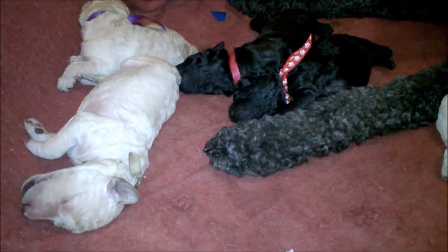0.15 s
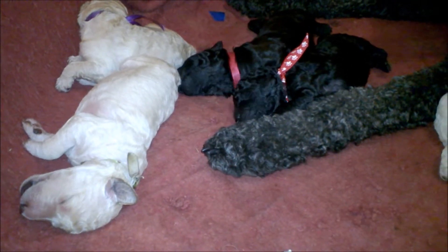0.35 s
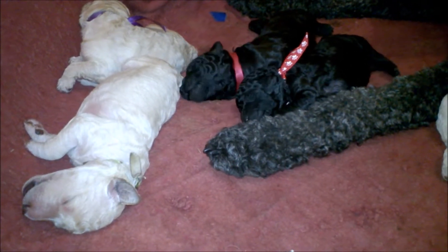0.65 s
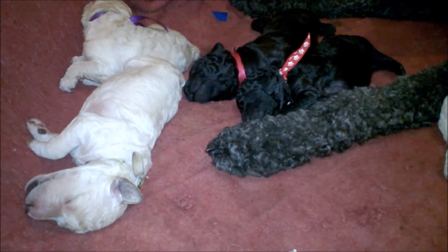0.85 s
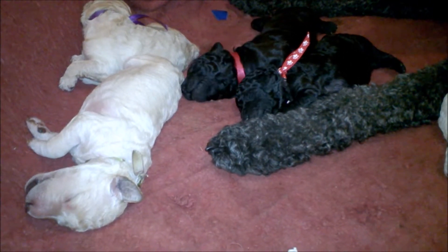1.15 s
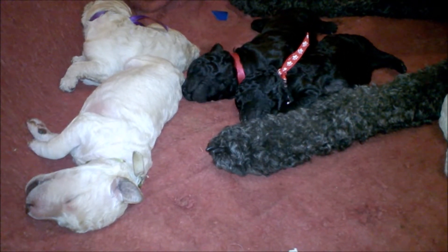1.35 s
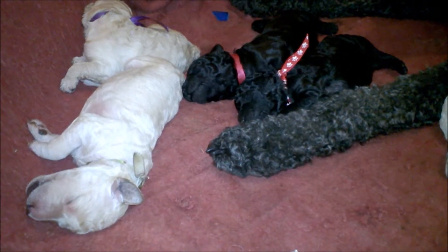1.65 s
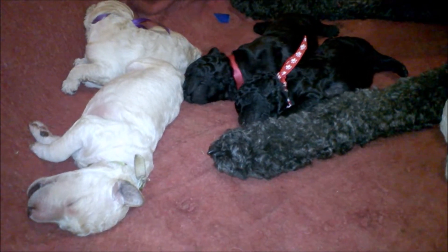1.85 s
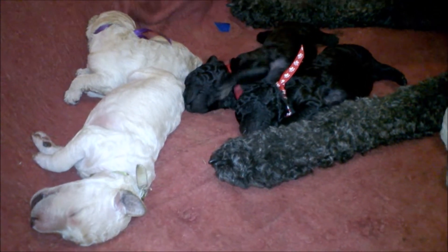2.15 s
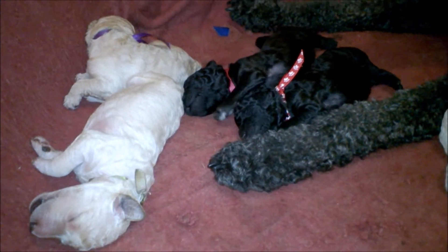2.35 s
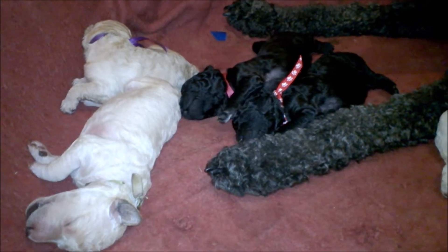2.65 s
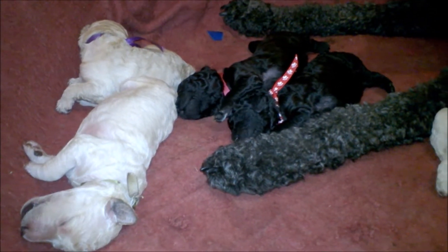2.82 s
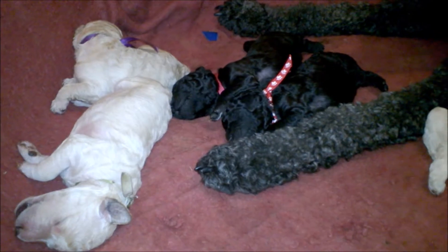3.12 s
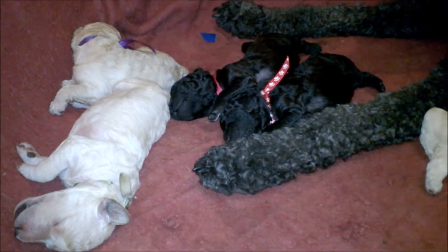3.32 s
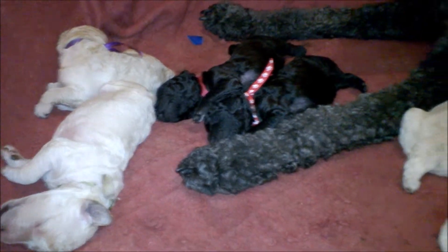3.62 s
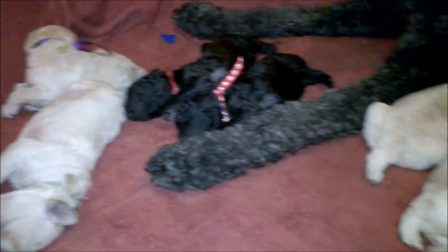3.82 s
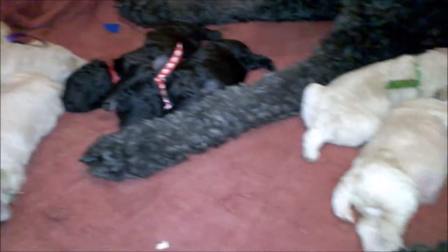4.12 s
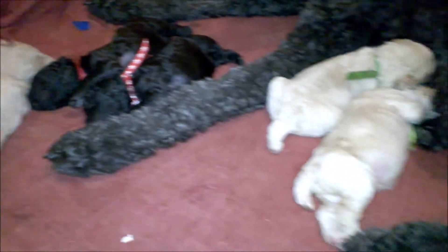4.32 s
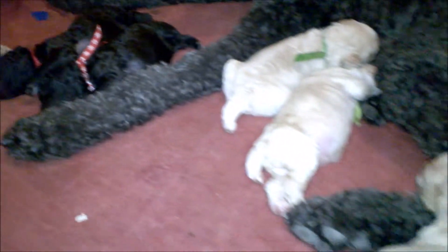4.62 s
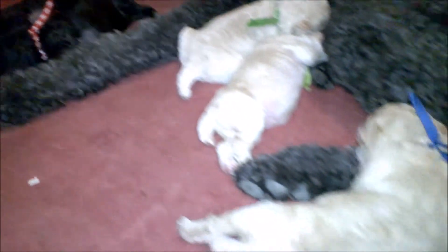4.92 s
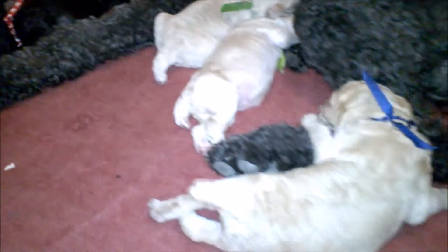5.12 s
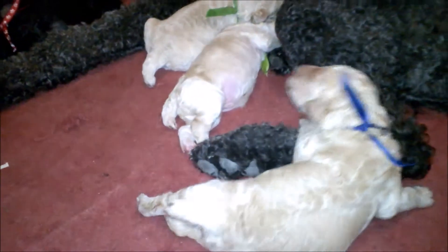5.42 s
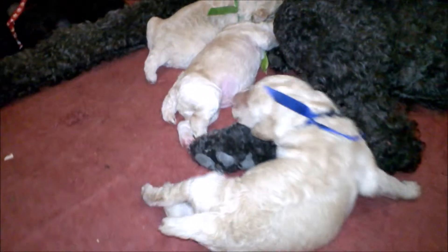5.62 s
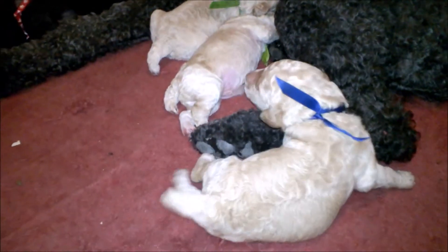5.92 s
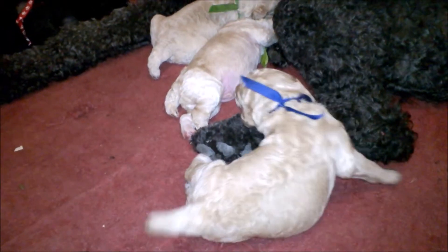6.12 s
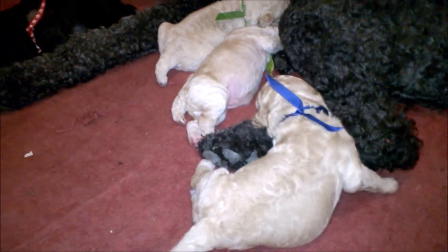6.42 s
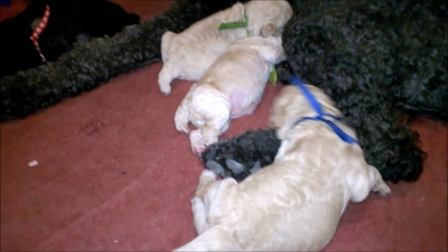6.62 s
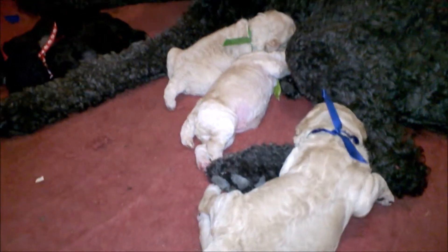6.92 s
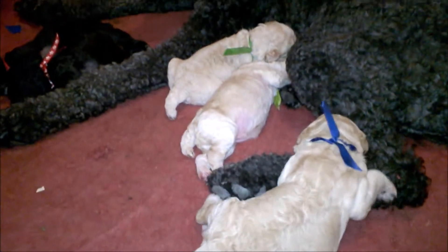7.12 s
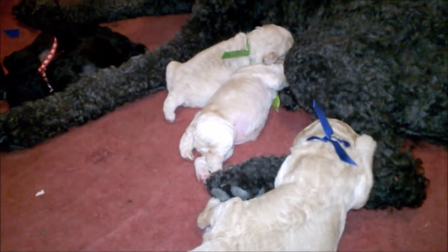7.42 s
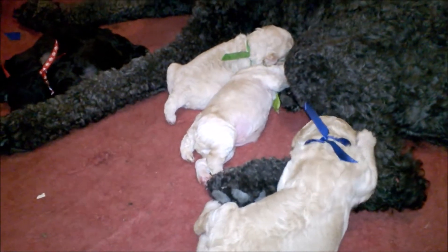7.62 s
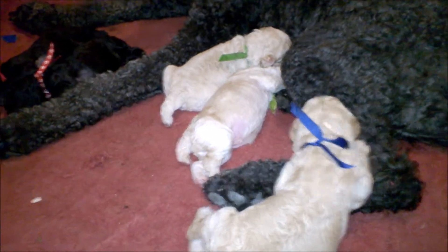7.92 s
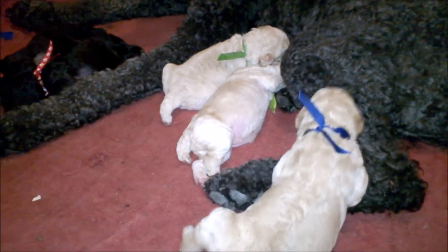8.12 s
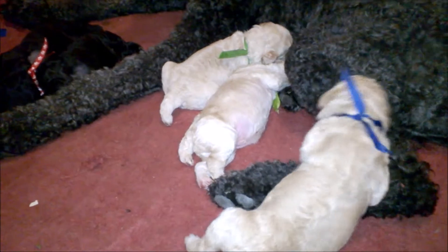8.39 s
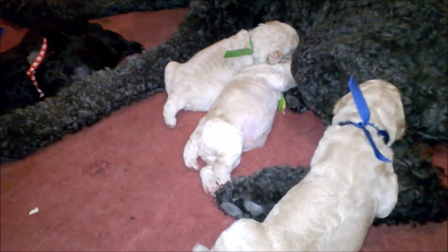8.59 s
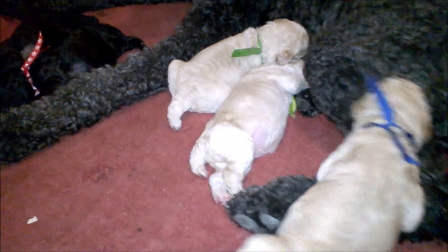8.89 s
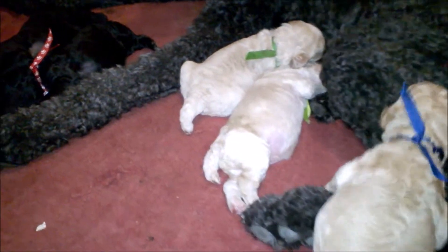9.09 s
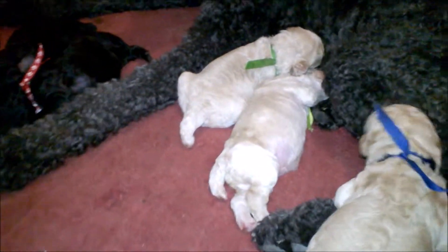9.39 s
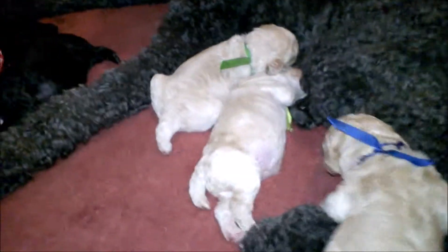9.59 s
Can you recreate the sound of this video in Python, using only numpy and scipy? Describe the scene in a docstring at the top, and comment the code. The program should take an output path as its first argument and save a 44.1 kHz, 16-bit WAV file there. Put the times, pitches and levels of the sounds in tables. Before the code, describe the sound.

Newborn puppies are heard up close in a small, soft room with a very faint rumble, hiss and electrical hum. For the first two seconds there are only quiet suckling gulps and tiny squeaks. Just after 2 seconds comes a falling whimper, followed by a faint throat creak. From about 3.4 to 6 seconds the puppies give a string of short, thin, sliding squeals, highest at first and slightly hoarse. Sharp wet lip smacks stand out at about 6.1 and 6.5 seconds, with softer ones later. From 6 seconds to just past 9, short, low, raspy grunts follow one another, mixed with creaks and brief squeaks around 7.6, 8.1 and 8.8 seconds. Fur rubs faintly on a blanket, mostly after 8 seconds. A soft puff from a nose and a last squeak come at about 9.5 seconds.

```python
"""On a blanket in a small, soft room, newborn puppies nurse and crawl under a phone.
Their vocal folds buzz in high squeaks and low grunts, turn hoarse when they lose step,
and creak when they flap slowly. Throats gulp, wet lips smack, fur rubs the blanket
and one nose snuffles in it. The room echoes briefly over a quiet rumble, hiss and mains hum."""
import sys
import numpy as np
from scipy import signal
from scipy.fft import rfft, irfft
from scipy.io import wavfile
from scipy.ndimage import uniform_filter1d

SR = 44100
rng = np.random.default_rng(int(sys.argv[2]) if len(sys.argv) > 2 else 0)


def store_wav(level_fs):
    """Save 16-bit WAV to argv[1]."""
    pcm = np.round(np.clip(np.atleast_2d(level_fs), -1, 1) * 32767)
    wavfile.write(sys.argv[1], SR, pcm.T.astype(np.int16))


N = 429975


def undb(db):
    """Turns decibels into a number to multiply by."""
    return 10 ** (np.asarray(db) / 20)


def unit(x):
    """Scales a sound to an average strength (RMS) of 1."""
    return x / np.sqrt(np.mean(x ** 2))


def band(x, hz, width, passes=1):
    """A resonance: keeps what lies near hz. More passes cut the rest more steeply."""
    for _ in range(passes):
        x = signal.lfilter(*signal.iirpeak(hz, hz / width, fs=SR), x)
    return x


def level_at(table, hz):
    """Reads a table of f/Hz, level/dB, with octaves evenly spaced."""
    freqs, levels = np.transpose(table)
    return np.interp(np.log(hz), np.log(freqs), levels)


def wobble(n, hz):
    """A random waver about 1 in size, with up to hz changes a second."""
    k = int(SR / hz)
    noise = rng.standard_normal(n + 2 * k)
    return unit(uniform_filter1d(uniform_filter1d(noise, k), k))[k:n + k]


def glide(rows, level_column, attack_s, release_s):
    """Start sample and a curve for each column after the time; the level fades in and out."""
    times, *columns = np.transpose([rows[0], *rows, rows[-1]])
    times[[0, -1]] += -attack_s, release_s
    columns[level_column][[0, -1]] -= 36  # dB quieter at both ends
    start = int(times[0] * SR)
    t = np.arange(start, min(int(times[-1] * SR), N)) / SR
    return start, [np.interp(t, times, column) for column in columns]


def swell(s, length, db0, db1, attack_s, release_s):
    """Start sample and gain of a sound that fades in, slides between two levels and fades out."""
    start, (db,) = glide([(s, db0), (s + length, db1)], 0, attack_s, release_s)
    return start, undb(db)


def add(out, start, x):
    """Mixes x into out from the start sample on."""
    x = x[:len(out) - start]
    out[start:start + len(x)] += x


# Tone of the background noise: f/Hz, relative level/dB
BACKGROUND_SHAPE = [(12, -73), (20, -3.5), (109, -2.5), (144, -8.5), (219, -6), (362, -14), (550, -16.5),
                    (650, -18), (768, -19.5), (933, -20.5), (1010, -23), (1380, -20), (1820, -25),
                    (3650, -22.5), (15500, -37)]
# Tones of the mains hum: f/Hz, level/dB
MAINS_HUM = [(59.5, -74), (120, -74)]


def background():
    """Room rumble and microphone hiss, flickering a little, with a wavering hum."""
    hz = np.maximum(np.fft.rfftfreq(N + 1, 1 / SR), 10)
    noise = irfft(rfft(rng.standard_normal(N + 1)) * undb(level_at(BACKGROUND_SHAPE, hz)))[:N]
    hum, t = np.zeros(N), np.arange(N) / SR
    for f, db in MAINS_HUM:
        gain = undb(db + 2.1 * wobble(N, 7.2))
        hum += gain * np.sin(2 * np.pi * f * t + 1.2 * wobble(N, 12))
    return unit(noise) * undb(-66.5 + 1.2 * wobble(N, 22)) + hum


# Chest, mouth and nose resonances: f/Hz, base width/Hz, level before rebalancing/dB
AIRWAY = [(259, 158, 0), (707, 274, 11.5), (1903, 390, -13.5)]


def throat(x, chest_db):
    """The airway rings at three frequencies; chest_db sets the chest against the mouth."""
    chest, mouth, nose = (undb(db) * band(x, hz, 1.14 * width, passes=2) for hz, width, db in AIRWAY)
    return (mouth - nose) / np.std(mouth) - undb(chest_db) * chest / np.std(chest)


def vocal_folds(calls, hoarse, overtones, *, harmonics, base_roughness, attack_s, release_s,
                pitch_shake, level_shake, shake_hz, rasp_db, mid_rasp_db, hiss_db):
    """Folds buzz at a pitch and its multiples (harmonics); rough folds shake and let air rasp."""
    out, roughness = np.zeros(N), np.full(N, base_roughness)
    for begin, end, value in hoarse:
        roughness[int(begin * SR):int(end * SR)] = value
    roughness = uniform_filter1d(roughness, int(0.0082 * SR)) ** 2
    for upper_db, rows in calls:
        start, (hz, first_db, mouth_db) = glide(rows, 1, attack_s, release_s)
        hz = uniform_filter1d(hz, int(0.0059 * SR), mode="nearest")  # muscles round the bends
        n = len(hz)
        rough = roughness[start:start + n]
        shaky_hz = hz * (1 + pitch_shake * rough * wobble(n, shake_hz))
        phase = 2 * np.pi * np.cumsum(shaky_hz) / SR
        second_db = first_db + mouth_db
        offset_db = second_db + upper_db - level_at(overtones, 2 * hz)
        levels = [first_db, second_db]
        levels += [offset_db + level_at(overtones, k * hz) for k in range(3, harmonics + 1)]
        tone = np.zeros(n)
        for k, db in enumerate(levels, start=1):
            flicker_db = min(2.1 * (k - 1), 3) * wobble(n, 88)  # each overtone on its own
            tone += undb(db + flicker_db) * np.sin(k * phase) * (k * hz < .45 * SR)
        shake = (1 + level_shake * rough * wobble(n, shake_hz)) / np.sqrt(1 + (level_shake * rough) ** 2)
        air = rng.standard_normal(n) * (1 + np.cos(phase))  # one puff each time the folds open
        breath = throat(air, chest_db=-9.5) + undb(mid_rasp_db) * unit(band(air, 1400, 1400, passes=2))
        rasp = rough * undb(np.maximum(first_db, second_db) + rasp_db) * breath
        # air hisses through the nostrils, more on tight high notes
        hiss = undb(second_db + hiss_db) * (hz / 1400) ** 2 * unit(band(air, 12000, 3500, passes=2))
        add(out, start, np.sqrt(2) * tone * shake + rasp + hiss)
    return out


# High calls: boost above the 2nd harmonic/dB, then points of t/s, f/Hz, level/dB, mouth opening/dB
# (mouth opening is how much louder the 2nd harmonic is than the 1st)
SQUEAK_CALLS = [ (-15, [(0.088, 706, -59.5, -17), (0.11, 633, -58, -15)]), (-16, [(1.477, 1270, -64, -6),
                (1.539, 1153, -58.5, -22)]), (-15.5, [(2.16, 829, -42, -16), (2.213, 1037, -40.5, -12.5),
                (2.251, 933, -43.5, -8.5), (2.29, 740, -38.5, -11.5), (2.33, 703, -39, -11.5),
                (2.37, 585, -53, -2), (2.397, 589, -39.5, -18), (2.425, 568, -56, -20)]),
                (-6, [(3.428, 1413, -51, -18), (3.435, 1279, -48, -13), (3.465, 1265, -34.5, -14.5),
                (3.487, 1250, -43, -7), (3.496, 1458, -31, -29), (3.52, 1560, -38, -17.5),
                (3.548, 1664, -37.5, -19), (3.61, 2013, -45.5, -30), (3.642, 1964, -46, -21),
                (3.7, 1700, -61, -23)]), (-8.5, [(3.93, 1620, -51.5, -23), (3.94, 1444, -49.5, -11),
                (3.975, 1360, -34, -21.5), (4.01, 1401, -44, -7), (4.031, 1415, -38, -13),
                (4.075, 1239, -39, -13), (4.095, 1252, -49.5, -11), (4.13, 1277, -64, -23)]),
                (-7, [(4.33, 1150, -49.5, -7), (4.367, 1390, -43, -22), (4.393, 1333, -45.5, -12.5),
                (4.439, 850, -34.5, -7.5), (4.46, 804, -38, -22), (4.475, 828, -50, -25),
                (4.51, 840, -66, -30)]), (-12, [(4.73, 784, -40, -36), (4.756, 821, -39.5, -29),
                (4.794, 783, -35, -25), (4.864, 669, -37.5, -18), (4.885, 668, -57, -23),
                (4.925, 693, -63, -21)]), (-12, [(5.09, 695, -39.5, -35), (5.11, 779, -35, -33),
                (5.125, 910, -40.5, -12), (5.149, 1040, -41.5, -14), (5.189, 967, -41, -6.5),
                (5.24, 757, -32.5, -23.5), (5.275, 631, -40, -22)]), (-9, [(5.865, 1545, -55, -35),
                (5.882, 1538, -42, -38), (5.893, 1480, -44, -40), (5.915, 1034, -51, -36),
                (5.948, 855, -37, -30), (5.98, 1004, -47, -35), (6.022, 1000, -57, -26)]),
                (-24, [(7.6, 1144, -47.5, -40), (7.635, 924, -35.5, -40), (7.651, 917, -40, -20.5),
                (7.683, 1210, -48, -40), (7.73, 1237, -65, -30)]), (-20, [(7.675, 945, -48, -35),
                (7.72, 966, -57, -33)]), (-13, [(8.065, 1174, -55, -21), (8.096, 1106, -47, -21),
                (8.12, 970, -43.5, -31), (8.13, 800, -60, -30)]), (-8, [(8.82, 1178, -46.5, -25),
                (8.838, 931, -42.5, -14), (8.86, 677, -40, -13), (8.872, 643, -46.5, -18)]),
                (-19, [(9.145, 1267, -55, -30), (9.164, 1325, -44.5, -23.5), (9.2, 1180, -42.5, -23),
                (9.246, 1193, -39.5, -32), (9.3, 1250, -58, -25)]), (-17, [(9.575, 1042, -48.5, -15),
                (9.59, 839, -41, -33), (9.602, 810, -43, -25), (9.612, 910, -58.5, -15),
                (9.66, 948, -66, -13)]), ]
# Where the folds lose step: from t/s, to t/s, roughness/0-1
SQUEAK_ROUGH_SPELLS = [(1.53, 1.59, .3), (2.14, 2.2, .3), (2.33, 2.4, .25), (3.5, 3.72, .3),
                       (3.96, 4.04, .25), (4.04, 4.14, .36), (4.32, 4.53, .34), (4.74, 4.9, .24),
                       (5.08, 5.12, .3), (5.2, 5.3, .24), (5.85, 5.92, .4), (5.97, 6.04, .33),
                       (7.6, 7.75, .28), (8.1, 8.15, .3), (9.56, 9.66, .4)]
# Shape of the higher harmonics: f/Hz, relative level/dB
SQUEAK_OVERTONES = [(1500, 0), (2100, 2), (2900, -15), (4600, -21), (6000, -34), (7000, -39), (8300, -41),
                    (9300, -29), (11200, -33), (12200, -52), (16000, -62)]


def squeaks():
    """Tight vocal folds buzz fast in thin, sliding cries."""
    return vocal_folds(SQUEAK_CALLS, SQUEAK_ROUGH_SPELLS, SQUEAK_OVERTONES,
                       harmonics=9, base_roughness=0.16, attack_s=.015, release_s=.038,
                       pitch_shake=0.2, level_shake=3.7, shake_hz=160,
                       rasp_db=-21.5, mid_rasp_db=14, hiss_db=-25)


# Swallows while suckling: t/s, peak level/dB, f/Hz, length/s
SWALLOWS = [(0.104, -59.5, 236.5, 0.086), (0.389, -61.5, 247, 0.073), (0.635, -68, 242, 0.06),
            (0.909, -60, 238, 0.045), (1.457, -68, 263, 0.058), (1.72, -60, 222, 0.047),
            (1.984, -59, 213, 0.066), (2.504, -57, 173, 0.044), (2.78, -59, 339, 0.053),
            (4.165, -58, 241, 0.047), (5.805, -62, 228, 0.047), (7.401, -59.5, 183, 0.05),
            (7.817, -63, 210.7, 0.027), (9.335, -57.5, 223, 0.069)]


def gulps():
    """A dull low bump in the throat, with a faint whistle from the nose on top."""
    out = np.zeros(N)
    for s, db, hz, length in SWALLOWS:
        n = int(length * SR)
        bump = np.sin(2 * np.pi * np.cumsum(hz * (1 + 0.13 * wobble(n, 60))) / SR)
        whistle = unit(band(rng.standard_normal(n), 1350, 140))
        add(out, int(s * SR), undb(db) * np.hanning(n) * (bump + undb(-12.5) * whistle))
    return out


# Wet lips parting: t/s, ring level/dB, ring f/Hz, relative tick level/dB
LIP_SMACKS = [(0.281, -51, 2340, -13), (4.854, -47, 1490, -19), (6.1177, -24.5, 1380, -27),
              (6.195, -50, 6000, -12), (6.495, -33, 960, -18), (6.5509, -28.5, 1130, -15),
              (6.566, -43, 1250, -13), (7.262, -37.5, 795, -22), (7.359, -51, 890, -22),
              (7.415, -55, 850, -22), (7.431, -58, 900, -22), (8.657, -44.5, 8000, -20),
              (8.687, -47.5, 5940, -21), (9.03, -51, 850, -20), (9.166, -52, 2960, 5.5),
              (9.544, -49.5, 4400, -14), (9.569, -46, 4200, -15)]


def smacks():
    """A wet tick, then the opening mouth rings and dies away within a few cycles."""
    out, t = np.zeros(N), np.arange(int(.02 * SR)) / SR
    for s, db, hz, tick_db in LIP_SMACKS:
        age = t * min(hz, 3000) / 0.41  # the ring is strongest at age 1
        ring = np.sin(2 * np.pi * hz * t) * age * np.exp(1 - age)
        burst = rng.standard_normal(len(t)) * np.exp(-t / 0.00058)
        tick = 5 * band(burst, 3000, 3900, passes=3)
        add(out, int(s * SR), undb(db) * (ring + undb(tick_db) * tick))
    return out


# Low calls: boost above the 2nd harmonic/dB, then points of t/s, f/Hz, level/dB, mouth opening/dB
GRUNT_CALLS = [ (6, [(0.527, 410, -74.5, 17), (0.551, 448, -63.5, -6.5)]), (3, [(0.845, 440, -66, 6.5),
               (0.871, 458, -72, 4), (0.89, 488, -66, -25)]), (-5, [(1.183, 557, -62, -10),
               (1.211, 473, -69, 1), (1.24, 470, -68, -3)]), (6, [(6.057, 331.8, -42.5, -5),
               (6.091, 359.6, -45.5, 8), (6.153, 323, -43, -2.5), (6.175, 321.5, -46, -8)]),
               (-1, [(6.385, 285.4, -50, -2.5), (6.4, 290.6, -42, -8), (6.427, 306.5, -43, -0.5),
               (6.495, 321.3, -48.5, -10)]), (-5.5, [(6.725, 332.7, -60.5, 9), (6.745, 346, -45, 2.5),
               (6.81, 354.3, -47, 8.5), (6.845, 342.3, -46.5, 7.5), (6.889, 322.6, -42.5, 1.5),
               (6.915, 284, -49, -21)]), (-12.5, [(7.165, 468, -51, 3), (7.216, 415, -53.5, 17.5),
               (7.25, 407.5, -47.5, 10.5), (7.27, 403, -46, -10), (7.3, 402, -63, -8)]),
               (4, [(8.185, 321.2, -60, -12), (8.23, 316, -45.5, -5.5), (8.272, 330.2, -45.5, 4.5),
               (8.298, 314.5, -37.5, -19)]), (5, [(8.5, 240.3, -59, -8), (8.533, 279.7, -50, -8),
               (8.555, 311.6, -40.5, -6), (8.58, 313, -46, -15)]), (7.5, [(8.795, 232.3, -60, 1),
               (8.837, 299.3, -42, -5), (8.859, 310, -35.5, -16)]), (6.5, [(9.06, 224, -55.5, -8.5),
               (9.084, 262.2, -48.5, -4.5), (9.108, 276.8, -47, -14), (9.14, 305.5, -44, -4),
               (9.176, 357, -37.5, 1), (9.188, 284, -37.5, -17), (9.21, 270, -54.5, -8)]), ]
# Where the folds lose step: from t/s, to t/s, roughness/0-1
GRUNT_ROUGH_SPELLS = [(.51, .58, .4), (.83, .9, .3), (6.155, 6.21, .32), (6.45, 6.52, .42),
                      (6.85, 6.94, .27), (7.15, 7.17, .4), (7.26, 7.31, .36), (8.17, 8.235, .38),
                      (8.285, 8.34, .3), (8.48, 8.62, .34), (8.77, 8.91, .28), (9.05, 9.13, .3),
                      (9.13, 9.24, .24)]
# Shape of the higher harmonics: f/Hz, relative level/dB
GRUNT_OVERTONES = [(700, 9), (1050, 0), (1400, -21), (1950, -18), (2500, -32.5), (3000, -48.5), (4000, -42),
                   (8000, -63)]


def grunts():
    """The folds buzz lower, and air rasps in the throat."""
    return vocal_folds(GRUNT_CALLS, GRUNT_ROUGH_SPELLS, GRUNT_OVERTONES,
                       harmonics=14, base_roughness=0.15, attack_s=.028, release_s=.028,
                       pitch_shake=0.23, level_shake=1.6, shake_hz=233,
                       rasp_db=13.5, mid_rasp_db=-23, hiss_db=-54)


# Voice creaks: t/s, length/s, start level/dB, end level/dB, chest share/dB, flap f/Hz
VOICE_CREAKS = [(2.134, .025, -58.5, -45, -13, 120), (2.64, .13, -64, -61, -11, 70.1),
                (4.285, 0.047, -62, -52, -8, 109.8), (4.505, 0.043, -61, -64.5, -3.5, 119),
                (4.672, 0.071, -55.5, -44.5, -11, 90), (5.067, .03, -49.5, -51.5, -7.5, 110.2),
                (5.479, 0.095, -56.5, -44.5, -6.5, 130.2), (7.134, .03, -51, -46, -10.5, 120.3),
                (7.515, .13, -52, -46, -12.5, 60.1), (7.915, 0.042, -59, -47, -2, 129.3),
                (8.172, 0.047, -58, -58.5, 0, 119.5)]


def creaks():
    """Slack folds flap slowly and unevenly; each flap and its puff of air ring the throat."""
    out = np.zeros(N)
    for s, length, db0, db1, chest_db, flap_hz in VOICE_CREAKS:
        start, gain = swell(s, length, db0, db1, attack_s=.025, release_s=.04)
        n = len(gain)
        cycles = np.cumsum(flap_hz * np.exp(.25 * wobble(n, 120))) / SR
        flaps = np.diff(np.floor(cycles), prepend=0) * undb(1.95 * wobble(n, 150))  # one click a cycle
        puffs = 0.073 * np.exp(-(cycles % 1) / 0.77) * rng.standard_normal(n)
        add(out, start, throat(flaps + puffs, chest_db) * gain)
    return out


def grainy_hiss(rows, hz, width):
    """Soft swells of noise around hz, made grainy by a fast flutter in level."""
    out = np.zeros(N)
    for row in rows:
        start, gain = swell(*row, attack_s=.05, release_s=.082)
        grains = rng.standard_normal(len(gain)) * undb(1.6 * wobble(len(gain), 200))
        add(out, start, unit(band(grains, hz, width)) * gain)
    return out


# Rubs on the blanket: t/s, length/s, start level/dB, end level/dB
BLANKET_RUBS = [(5.551, 0.24, -72, -76), (5.82, .05, -70, -77), (8.205, 0.14, -75, -75),
                (8.419, .3, -80.5, -73), (8.762, 0.15, -64, -66), (8.962, 0.15, -78, -71),
                (9.162, 0.067, -67, -70), (9.251, .15, -72, -82), (9.557, .02, -69, -72),
                (9.633, 0.069, -87, -90)]


def rubs():
    """Blanket fibres slip under fur and paws with a bright hiss."""
    return grainy_hiss(BLANKET_RUBS, hz=4500, width=2600)


# A breath into the blanket: t/s, length/s, start level/dB, end level/dB
NOSE_PUFF = [(9.45, .045, -68, -65)]


def snuffle():
    """A nose blows one dull puff of air into the fibres."""
    return grainy_hiss(NOSE_PUFF, hz=1500, width=1500)


def room(x):
    """Dull echoes from walls and bedding die away quickly."""
    t = np.arange(int(.4 * SR)) / SR
    decay = undb(-60 * t / 0.14) * (t > .003)  # starts after 3 ms, 60 dB down at 0.14 s
    tail = band(rng.standard_normal(len(t)), 1210, 2300) * decay
    return signal.fftconvolve(x, tail / np.sqrt(np.sum(tail ** 2)))[:N]


def scene():
    """Mixes the puppies, their echo and the background into one channel."""
    high = squeaks()
    low = grunts() + creaks() + gulps()
    lips = smacks()
    echo = room(undb(-14) * high + undb(-14.5) * low + undb(-19.5) * lips)
    return (high + low + lips + echo + rubs() + snuffle() + background())[None]


def record(dry):
    """The phone cuts the treble above 15700 Hz."""
    return signal.sosfilt(signal.ellip(10, .2, 60, 15700, fs=SR, output="sos"), dry)


dry = scene()
out = record(dry)
store_wav(out)
```